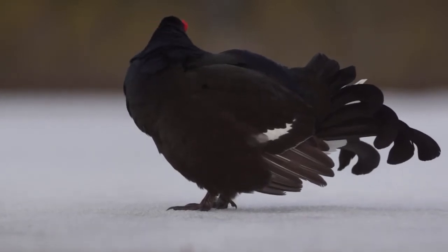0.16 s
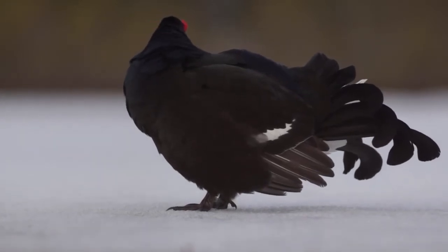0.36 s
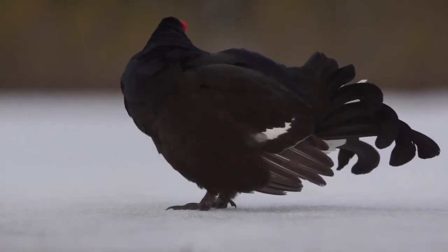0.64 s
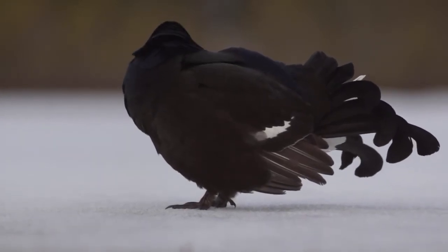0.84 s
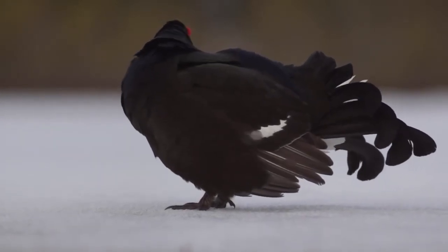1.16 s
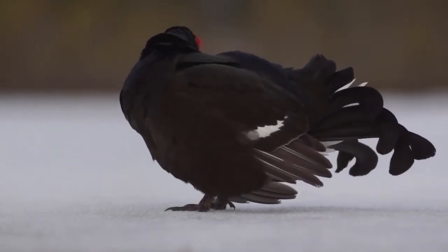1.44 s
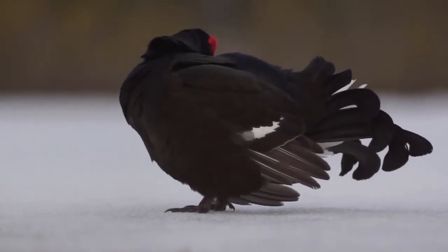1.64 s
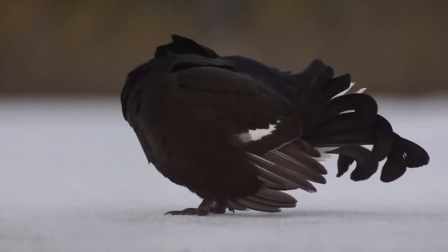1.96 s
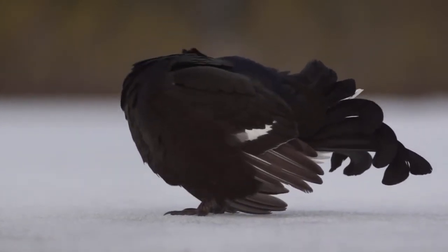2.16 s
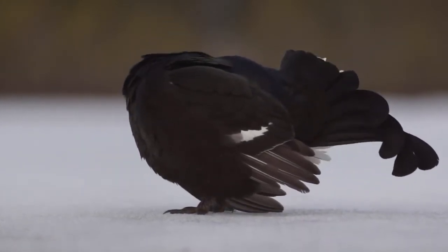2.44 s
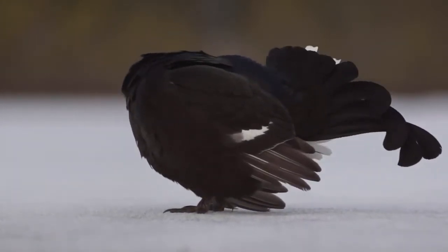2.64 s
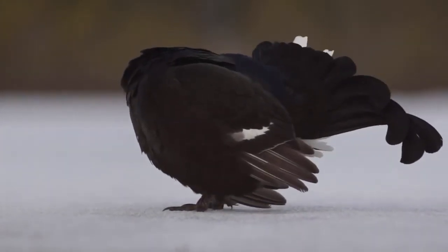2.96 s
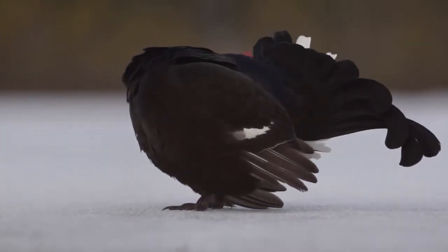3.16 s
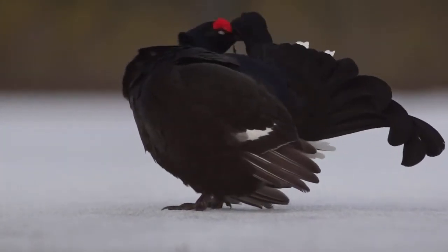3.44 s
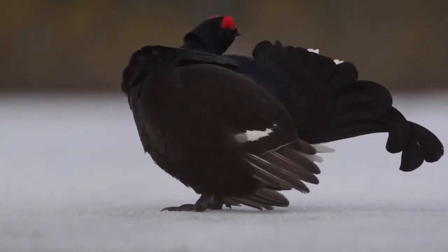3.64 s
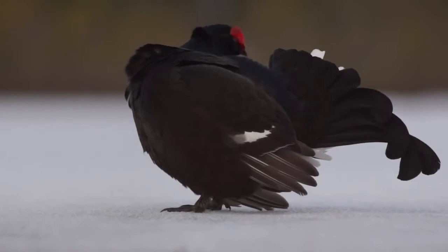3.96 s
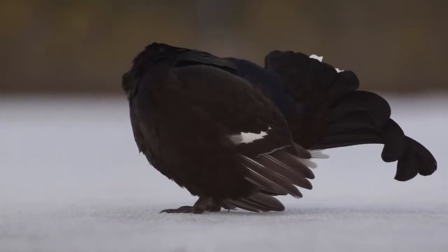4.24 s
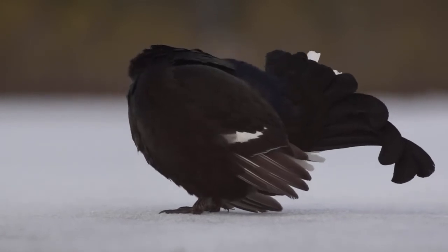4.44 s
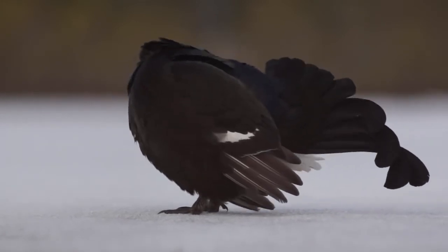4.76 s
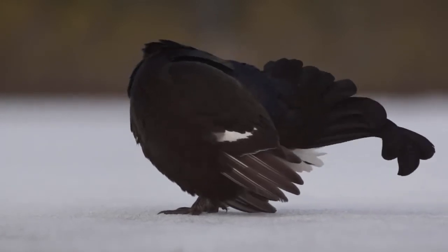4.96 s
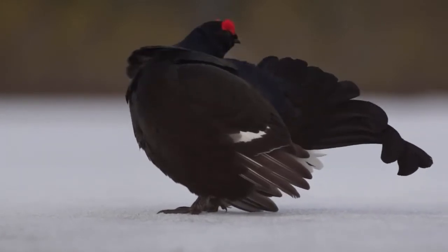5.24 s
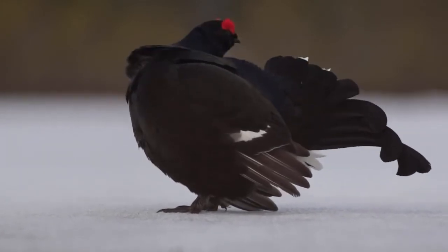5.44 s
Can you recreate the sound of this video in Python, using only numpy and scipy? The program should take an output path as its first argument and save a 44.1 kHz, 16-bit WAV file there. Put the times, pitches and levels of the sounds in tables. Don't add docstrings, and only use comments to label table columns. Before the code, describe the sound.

Continuous low, hollow grouse bubbling rises and falls outdoors, crossed by a breathy hiss twice and faint high whistled tweets on the right.

```python
import sys
import numpy as np
from scipy import signal
from scipy.fft import rfft, irfft, next_fast_len
from scipy.io import wavfile
from scipy.ndimage import map_coordinates

SR = 44100
rng = np.random.default_rng(int(sys.argv[2]) if len(sys.argv) > 2 else 0)


def master_out(mix):
    frames = np.transpose(np.atleast_2d(mix))
    ceiling = np.clip(frames, -1, 1)
    pcm = np.round(ceiling * 32767).astype(np.int16)
    wavfile.write(sys.argv[1], SR, pcm)


def boost(x):
    u = np.asarray(x, float) / 20
    return 10 ** u


N = 247401

# centre_hz, half_width_hz
OPEN_BEAK = (1000, 90000)


def unit(x):
    return x / np.sqrt(np.mean(x ** 2) + 1e-20)


def along(points, hz):
    point_hz, value = np.transpose(points)
    return np.interp(np.log(hz + 1), np.log(point_hz + 1), value)


def filtered(x, response):
    size = next_fast_len(N + SR // 2)
    spectrum = rfft(x, size) * response(np.fft.rfftfreq(size, 1 / SR))
    return irfft(spectrum, size)[..., :N]


def noise(curve_db):
    white = rng.standard_normal(N)
    return unit(filtered(white, lambda hz: boost(along(curve_db, hz))))


def wobble(rate_hz):
    knots = rng.standard_normal(int(N * rate_hz / SR) + 4)
    return map_coordinates(knots, [np.arange(N) * rate_hz / SR])


def placed(x, left_db, right_db, lag_s):
    side = np.array([[1], [-1]])
    turned = filtered(x, lambda hz: np.exp(-1j * np.pi * hz * lag_s * side))
    return turned * boost([[left_db], [right_db]])


def slid(rows, bend=0):
    return [(s, length, a, (a + b) / 2 * (1 + bend), b, db) for s, length, a, b, db in rows]


def bowed(rows):
    sag = .05
    return [(s, length, edge + sag * hz / 2, hz, edge - sag * hz / 2, db) for s, length, hz, edge, db in rows]


def sung(rows, roundness, overtone_db, sac):
    out = np.zeros(N + 2 * SR)
    phases = rng.uniform(0, 2 * np.pi, (len(rows), 1))
    sac_hz, half_width_hz = sac
    for (centre_s, length_s, first_hz, middle_hz, last_hz, db), phase in zip(rows, phases):
        u = np.linspace(-.5, .5, round(length_s * SR))
        slope = last_hz - first_hz
        curve = 2 * (first_hz + last_hz - 2 * middle_hz)
        hz = middle_hz + slope * u + curve * u ** 2
        cycle = phase + 2 * np.pi * np.cumsum(hz) / SR
        resonance = 1 / np.hypot(1, (hz - sac_hz) / half_width_hz)
        swell = np.abs(np.cos(np.pi * u)) ** roundness * resonance
        tone = np.sin(cycle) + boost(overtone_db) * np.sin(2 * cycle)
        start = SR + round((centre_s - length_s / 2) * SR)
        out[start:][:len(u)] += boost(db) * swell * tone
    return out[SR:SR + N]


def air():
    # pitch_hz, level_db
    mid_curve = [(59, -55), (100, -26.5), (207, -14), (300, -8.5), (480, -5), (680, -11.5), (1110, -13),
                 (2120, -15.5), (6000, -19), (14400, -23.5)]
    side_curve = [(59, -46), (100, -30), (183, -22), (294, -14.5), (597, -9), (800, -7.5), (1500, -11),
                  (3000, -17), (7000, -23.5), (14400, -28.5)]
    level_db = -60.5
    mid = boost(level_db + 0.14 * wobble(1.23)) * noise(mid_curve)
    side = boost(level_db + 1.15 + 0.34 * wobble(1.5)) * noise(side_curve)
    return np.array([mid + side, mid - side])


def breeze():
    bass_curve = [(15, -42), (45, -5), (90, -4.5), (160, 3.5), (300, -21)]  # pitch_hz, level_db
    stir = np.array([noise(bass_curve), noise(bass_curve)])
    stir += 0.53 * stir[::-1]
    own_lumps = np.array([wobble(7.4), wobble(6.8)])
    return boost(-86.5 + 2.7 * wobble(6) + 5 * own_lumps) * stir


def loose_bubbles():
    # centre_s, length_s, start_hz, end_hz, peak_db
    strays = [(.012, .028, 545, 405, -31), (.035, .05, 430, 450, -48), (1.704, .025, 420, 390, -39),
              (1.782, .016, 460, 420, -39), (1.84, .017, 450, 430, -41), (1.856, .017, 415, 390, -37),
              (1.921, .015, 410, 410, -38), (1.538, .039, 550, 480, -42), (1.596, .06, 520, 440, -45),
              (1.637, .06, 420, 450, -47), (1.728, .023, 450, 350, -44), (1.778, .06, 490, 430, -50),
              (1.878, .05, 390, 350, -50), (2.004, .05, 480, 360, -47), (2.152, .05, 440, 340, -44),
              (5.551, .061, 380, 380, -44), (5.602, .018, 450, 350, -43)]
    return slid(strays, bend=.06)


def phrases():
    # centre_s, length_s, middle_hz, edge_hz, peak_db
    rival_bows = [(.1, .079, 574, 467, -44), (.34, .022, 478, 487, -36.5), (.394, .032, 456, 590, -40),
                  (.433, .017, 461, 467, -39.5), (.474, .017, 452, 490, -38.5), (.519, .058, 571, 390, -38),
                  (.609, .062, 531, 292, -42.5), (.745, .09, 543, 285, -47), (.87, .056, 611, 350, -44),
                  (.899, .021, 463, 490, -41.5), (.965, .043, 520, 416, -36), (1.052, .11, 580, 415, -39),
                  (1.053, .043, 617, 513, -28), (1.083, .025, 470, 580, -41), (1.116, .014, 487, 615, -40),
                  (1.17, .014, 470, 270, -43), (1.408, .046, 566, 420, -43), (1.43, .028, 579, 490, -32.5),
                  (1.451, .016, 395, 377, -42), (1.482, .051, 578, 472, -39)]
    # centre_s, length_s, start_hz, end_hz, peak_db
    rival_slides = [
        (.144, .045, 560, 460, -39.5),
        (.24, .029, 640, 400, -36.5),
        (.345, .072, 470, 630, -43.5),
        (.661, .054, 505, 415, -41),
        (.79, .05, 550, 440, -35.5),
        (.96, .019, 625, 543, -28),
        (1.152, .1, 595, 470, -43.5),
        (1.153, .014, 600, 440, -42),
    ]
    # centre_s, length_s, middle_hz, edge_hz, peak_db
    near_bows = [(3.138, .085, 545, 450, -38), (3.343, .052, 510, 610, -45.5),
                 (3.37, .023, 430, 510, -35.5), (3.386, .04, 560, 487, -40), (3.5, .026, 449, 510, -37.5),
                 (3.524, .053, 584, 545, -41.5), (3.542, .022, 425, 410, -39.5),
                 (3.561, .056, 570, 303, -41), (3.646, .11, 524, 482, -46.5),
                 (3.699, .069, 572, 432, -44.5), (3.768, .05, 557, 478, -42), (3.804, .021, 500, 482, -33),
                 (3.84, .068, 576, 485, -45.5), (3.998, .056, 541, 398, -45.5),
                 (4.084, .064, 591, 470, -25.5), (4.114, .022, 470, 480, -38), (4.162, .063, 534, 297, -39),
                 (4.198, .014, 494, 630, -39), (4.466, .02, 385, 420, -43)]
    # centre_s, length_s, start_hz, end_hz, peak_db
    near_slides = [(3.174, .026, 520, 430, -35.5), (3.271, .04, 615, 455, -32),
                   (3.421, .025, 535, 430, -36.5), (3.463, .024, 385, 480, -39.5),
                   (3.595, .058, 486, 549, -42.5), (3.684, .043, 530, 415, -34.5),
                   (3.829, .022, 447, 520, -31.5), (3.851, .0225, 530, 437, -33.5),
                   (3.885, .024, 450, 535, -34), (3.92, .024, 610, 410, -36),
                   (3.943, .028, 490, 400, -46.5), (3.991, .022, 595, 520, -24.5),
                   (4.146, .021, 410, 500, -38), (4.241, .045, 590, 425, -34),
                   (4.447, .026, 615, 470, -30.5)]
    # climax_s, stretch_ratio, pitch_ratio, level_db, crescendo_db_per_s
    times = [
        (3.991, 1.0, 1.0, 0, 0),
        (1.116, .993, 1.003, -.5, .5),
    ]
    climax_s = 3.991
    near = []
    for at, stretch, ratio, more_db, crescendo in times:
        for s, length, a, hz, b, db in bowed(near_bows) + slid(near_slides):
            from_climax = s - climax_s
            level_db = db + more_db + crescendo * from_climax
            near.append((at + stretch * from_climax, length, ratio * a, ratio * hz, ratio * b, level_db))
    return near + bowed(rival_bows) + slid(rival_slides)


def far_cocks():
    # centre_s, length_s, start_hz, end_hz, peak_db
    calls = [
        (.203, .06, 570, 420, -55.5),
        (3.063, .045, 504, 373, -55),
        (4.856, .035, 445, 370, -59),
        (4.937, .024, 495, 410, -58),
        (5.327, .039, 365, 350, -50),
        (5.38, .057, 400, 330, -50.5),
        (5.459, .046, 370, 328, -50),
    ]
    return slid(calls)


def songbird():
    # last_flick_s, pitch_ratio, lead_in_db, rise_db
    tweets = [
        (.515, 1.04, -60, -53),
        (.819, 1.001, -61, -54.5),
        (1.121, .95, -61, -55),
        (1.497, 1.06, -75, -65),
        (2.46, 1.1, -75, -58),
        (2.6, .99, -75, -60),
        (2.714, 1.04, -72, -54),
        (2.882, .95, -59, -80),
    ]
    # s_from_last_flick, length_s, start_hz, end_hz, level_db
    lead_in = [
        (-.044, .016, 5200, 3800, 0),
    ]
    rise = [
        (-.026, .015, 3700, 4550, -5),
        (-.013, .014, 4520, 4400, -2),
        (-.003, .011, 4400, 4800, 0),
        (.007, .011, 4800, 5600, -1.5),
    ]
    rows = []
    for at, ratio, lead_db, rise_db in tweets:
        for part, part_db in ((lead_in, lead_db), (rise, rise_db)):
            for s, length, a, b, db in part:
                rows.append((at + s, length, ratio * a, ratio * b, db + part_db))
    return sung(slid(rows), roundness=0.21, overtone_db=-34, sac=OPEN_BEAK)


def hiss():
    # time_s, resonance_hz, level_db, focus_db (narrow ring over wide breath)
    calls = [
        [(1.022, 1712, -70, -6), (1.055, 1540, -54.5, 1), (1.12, 1353, -58, 9), (1.2, 1250, -60.5, -3),
         (1.29, 1210, -67, -5), (1.43, 1337, -58, -1), (1.48, 1390, -64, -10), (1.56, 1450, -61.5, -6),
         (1.78, 1750, -76, -13)],
        [(4.24, 1600, -68, 2), (4.265, 1480, -56.5, 7), (4.33, 1313, -54, 12), (4.42, 1224, -63, 3),
         (4.52, 1150, -68, -2.5), (4.61, 1353, -67, 2), (4.72, 1517, -67, -10), (4.77, 1590, -71, -4)],
    ]
    out, t = np.zeros(N), np.arange(N) / SR
    for call in calls:
        s, hz, db, focus_db = np.transpose(call)
        cycle = 2 * np.pi * np.cumsum(np.interp(t, s, hz)) / SR
        level_db = np.interp(t, s, db, -140, -140)
        half_db = np.interp(t, s, focus_db) / 2
        ring = (1, 60, -1.5 + half_db)
        breath = (1.05, 240, -4.5 - half_db)
        upper = (1.22, 110, -22 - half_db)
        for ratio, width_hz, share_db in (ring, breath, upper):
            slow = filtered(rng.standard_normal((2, N)), lambda f: 1 / (1 + (f / width_hz) ** 2))
            band = slow[0] * np.cos(ratio * cycle) + slow[1] * np.sin(ratio * cycle)
            out += boost(level_db + share_db) * unit(band)
    return out * boost(1.6 * wobble(60) + 1.4 * wobble(18))


def nudges():
    # start_s, length_s, level_db
    knocks = [
        (3.99, .05, -59),
        (4.025, .08, -58),
        (4.44, .045, -64.5),
        (1.08, .14, -72),
    ]
    # pitch_hz, level_db
    thud = [(20, -40), (60, -3), (140, 5), (230, 2.5), (310, -16), (600, -51)]
    swell = np.zeros(N)
    for start_s, length_s, db in knocks:
        size = round(length_s * SR)
        swell[round(start_s * SR):][:size] += boost(db) * np.sin(np.linspace(0, np.pi, size)) ** 1.1
    lumps_db = np.array([[1.2], [-1.2]]) + 2.5 * wobble(71)
    return swell * np.array([noise(thud), noise(thud)]) * boost(lumps_db)


def rolls():
    # first_s, last_s, first_effort (0-1), last_effort (0-1), level_db
    runs = [
        (1.642, 2.643, .1, 1.02, -35.5),
        (4.516, 4.805, .02, .33, -36),
        (5.055, 5.264, .26, .1, -36.5),
        (2.25, 2.388, .8, .05, -41),
    ]
    beat_s, start_hz, end_hz = .0716, 462, 360
    slack_hz, tight_hz = 372, 484
    slack_db, slack_leap_hz = -10, 30
    shortest_s, grows_s, briefest_effort = .037, .075, .6
    out = []
    for first, last, begin, end, db in runs:
        count = round((last - first) / beat_s) + 1
        efforts = np.clip(np.linspace(begin, end, count), 0, 1)
        for s, effort in zip(np.linspace(first, last, count), efforts):
            slack = (1 - effort) ** 2
            length_s = shortest_s + grows_s * (effort - briefest_effort) ** 2
            middle_hz = slack_hz + effort * (tight_hz - slack_hz)
            out.append((s, length_s, start_hz + slack_leap_hz * slack, middle_hz, end_hz, db + slack_db * slack))
    return out


def crests():
    # centre_s, length_s, start_hz, end_hz, peak_db
    tops = [
        (2.722, .068, 500, 405, -31.5),
        (2.79, .064, 575, 405, -33.5),
        (2.861, .034, 570, 385, -33.5),
    ]
    return slid(tops, bend=.125)


def bubbles():
    # centre_hz, half_width_hz
    throat = (458.3, 52.8)
    rows = phrases() + rolls() + crests() + loose_bubbles() + far_cocks()
    voices = sung(rows, roundness=0.62, overtone_db=-38.5, sac=throat)
    return filtered(voices, lambda hz: 1 / (1 + (270 / (hz + 1)) ** 8))


def high_clucks():
    # centre_s, length_s, start_hz, end_hz, peak_db
    calls = [
        (3.535, .045, 1210, 925, -57.5),
        (3.705, .052, 1200, 1010, -57),
        (3.77, .045, 1125, 1085, -57),
        (3.82, .039, 1066, 1036, -55.5),
        (3.878, .03, 1580, 1440, -52),
        (4.51, .08, 730, 645, -60),
    ]
    voice = sung(slid(calls), roundness=0.68, overtone_db=-40, sac=OPEN_BEAK)
    return voice * (1 + .5 * wobble(150))


def woods(x):
    # pitch_hz, t60_s
    decay = [(200, 0.48), (1000, 0.21), (6000, 0.21)]
    hz, t, z = signal.stft(rng.standard_normal((2, SR // 2)), SR, nperseg=256)
    fade = boost(-60 * t / along(decay, hz)[:, None])
    tail = signal.istft(z * fade, SR, nperseg=256)[1]
    tail = tail / np.linalg.norm(tail[0])
    late = np.pad(x, (1500, 0))
    return signal.fftconvolve(late[None], tail, axes=1)[:, :N]


def scene():
    cocks, tweets, hisser, clucks = bubbles(), songbird(), hiss(), high_clucks()
    grouse = placed(cocks, left_db=1.45, right_db=-4.5, lag_s=.00007)
    grouse += placed(hisser, left_db=6.0, right_db=-15.5, lag_s=-0.000012)
    grouse += placed(clucks, left_db=-1.7, right_db=-10, lag_s=.00001)
    small_bird = placed(tweets, left_db=-10, right_db=.1, lag_s=.00003)
    echoes = boost(-22) * woods(cocks + hisser + 3 * tweets)
    return grouse + small_bird + echoes + nudges() + breeze() + air()


def roll_off(x):
    return signal.sosfilt(signal.butter(12, 14460, fs=SR, output="sos"), x)


def record(dry):
    return roll_off(dry)


dry = scene()
out = record(dry)
master_out(out)
```